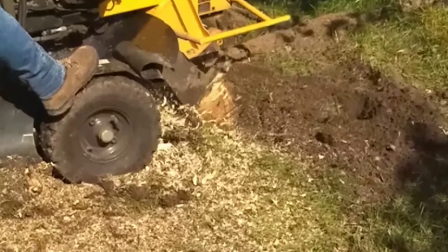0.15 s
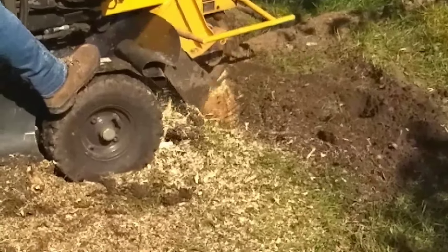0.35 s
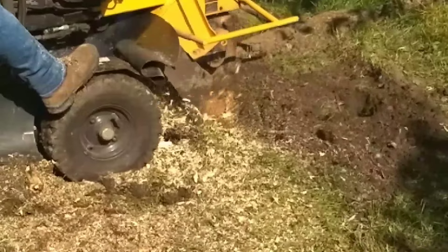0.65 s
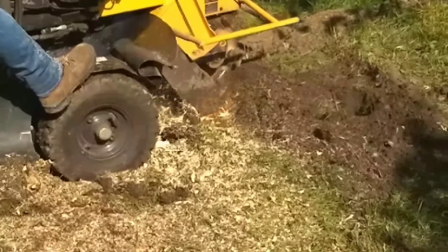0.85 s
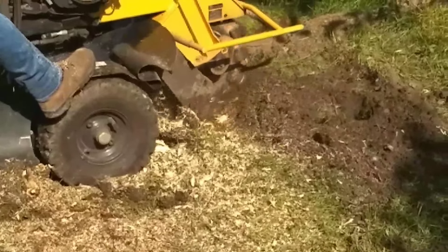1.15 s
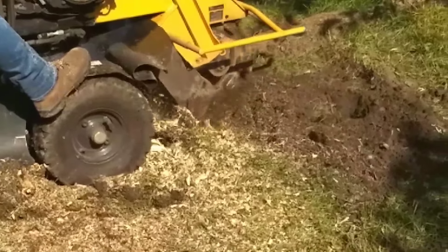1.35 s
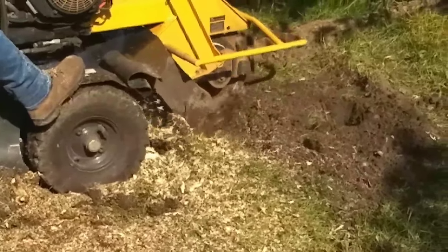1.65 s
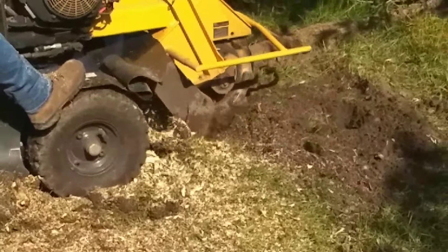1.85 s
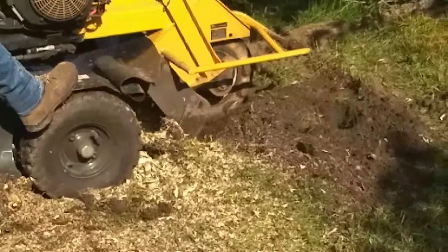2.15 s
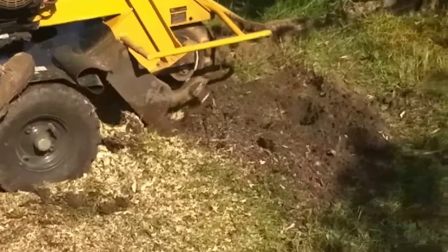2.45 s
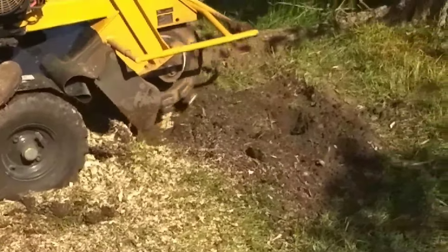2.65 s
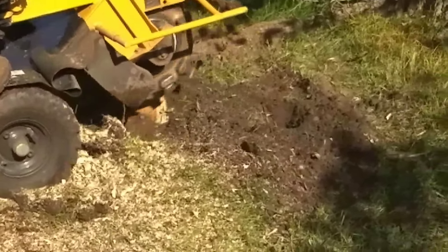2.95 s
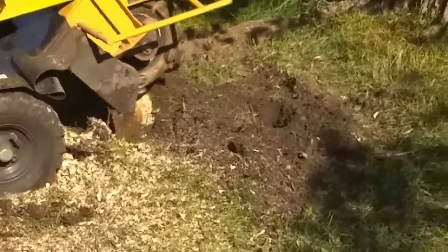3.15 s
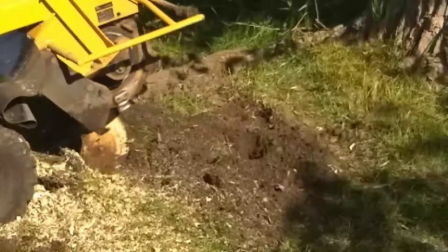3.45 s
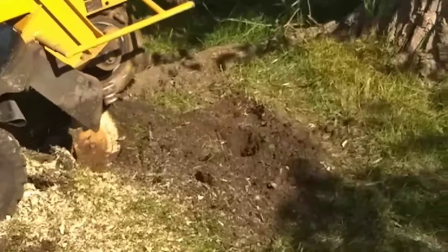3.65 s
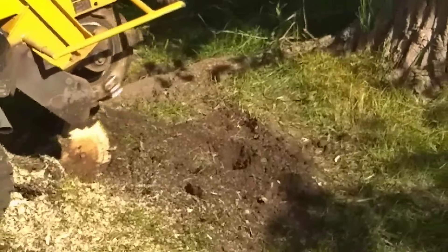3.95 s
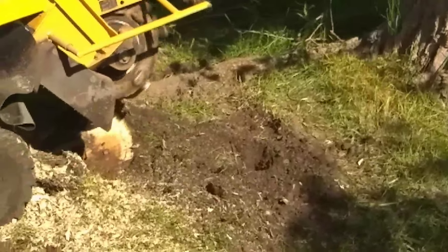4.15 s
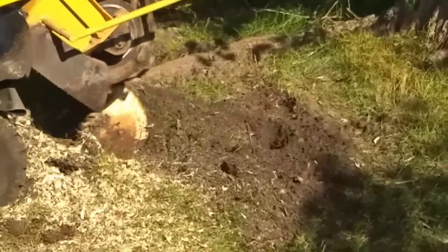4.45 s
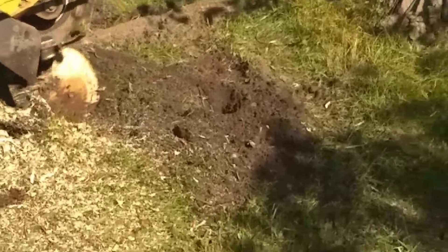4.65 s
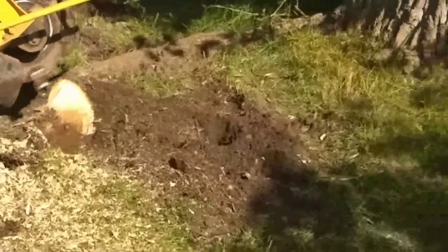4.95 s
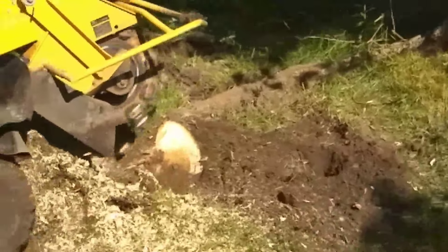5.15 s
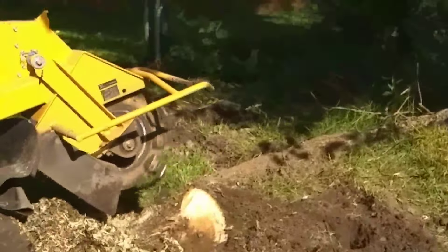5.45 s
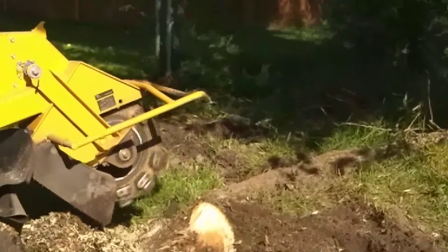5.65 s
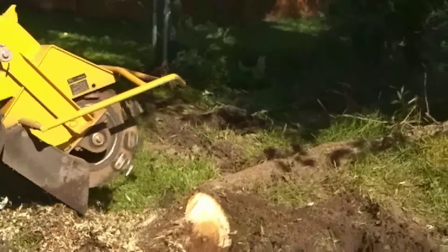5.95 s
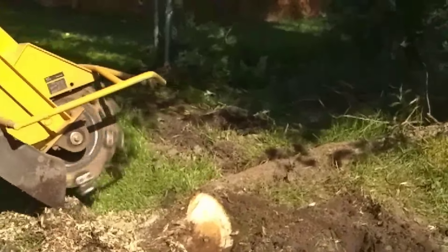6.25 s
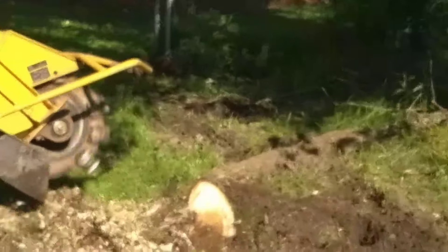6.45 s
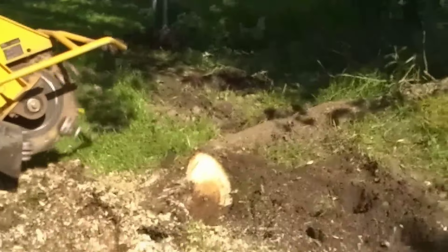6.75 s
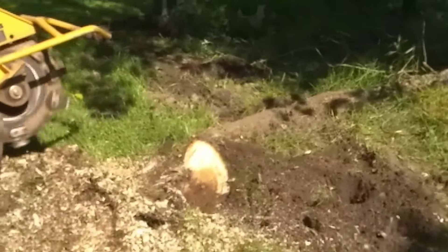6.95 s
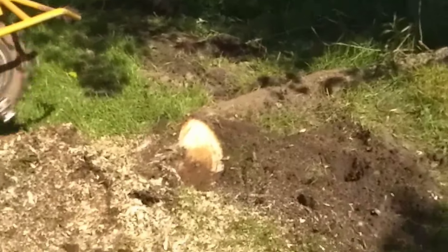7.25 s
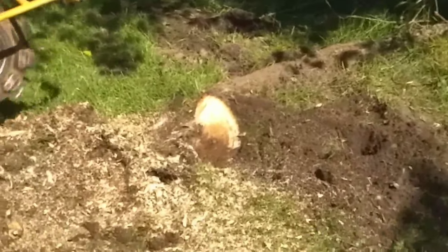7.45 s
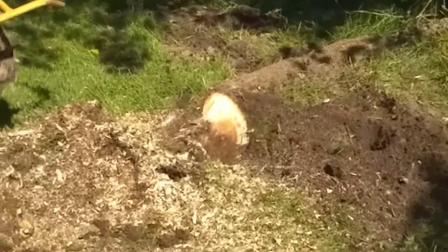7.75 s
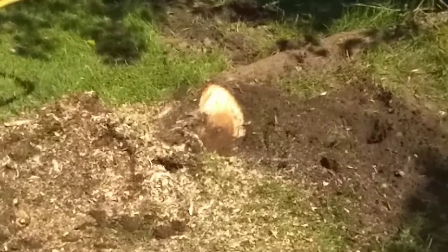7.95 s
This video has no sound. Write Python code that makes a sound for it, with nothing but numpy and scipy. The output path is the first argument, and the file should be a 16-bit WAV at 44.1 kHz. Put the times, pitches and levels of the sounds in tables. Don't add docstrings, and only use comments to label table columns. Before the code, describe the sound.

A loud stump grinder chews wood with a fast, rough, throbbing rattle while its labouring engine climbs slightly in pitch. Several sharp strikes clang close together, the level dips and recovers, and the cutting thins away. The freewheeling machine then keeps roaring, with fan and exhaust noise, belt whine and singing metal panels, and a single low knock. Close handheld microphone outdoors, wide hollow stereo, automatic level control, no obvious echo.

```python
import sys
import numpy as np
from scipy import signal
from scipy.fft import rfft, irfft, next_fast_len
from scipy.io import wavfile
from scipy.ndimage import map_coordinates

SR = 44100
rng = np.random.default_rng(int(sys.argv[2]) if len(sys.argv) > 2 else 0)


def transcribe(u):
    v = np.clip(np.atleast_2d(u).T, -1, 1)
    q = np.round(v * 32767).astype(np.int16)
    wavfile.write(sys.argv[1], SR, q)


def rack_gain(trim_db):
    fader = np.asarray(trim_db, float)
    return 10 ** (fader / 20)


N = 357210

# time_s, speed_cycles_per_s
ENGINE_SPEED = [(0, 28.3), (.5, 29.08), (.9, 30.17), (1.2, 30.73), (1.6, 30.54), (2.4, 30.89), (3.9, 30.67),
                (4.35, 30.77), (5.7, 30.44), (6.0, 30.51), (6.6, 30.51), (7.5, 30.74), (7.8, 30.5),
                (8.1, 30.5)]
FREE_CYCLES_PER_S, LABOUR_CYCLES_PER_S = 30.7, 28.3
# time_s, tooth_passes_per_engine_cycle
BELT_RATIO = [(0, 2.24), (.7, 2.252), (1.1, 2.263), (1.4, 2.276), (1.6, 2.258), (1.9, 2.27), (2.3, 2.293),
              (8.1, 2.293)]
# engine_multiple, rest_db, labour_gain_db
ENGINE_LINES = [(2, -38, 8), (3, -48.5, 8), (4, -49, 11), (5, -40, 7.5), (6, -36, 2), (7, -46, 12),
                (26.5, -46, -13), (32.5, -47, -5), (37, -41, -6)]
# engine_multiple, middle_s, length_s, peak_db
ENGINE_PANELS = [(4, 1.4, 2.2, -36.5), (4, 3, 3.3, -38), (7, 1.2, 0.61, -36), (5, 0.6, 1.1, -25.5),
                 (5, 2.18, 0.56, -37), (5, 3.75, .7, -48), (5, 5.13, 1.16, -36), (5, 6.64, 3, -33),
                 (6, 5.37, 2.75, -35), (26.3, 2.07, 0.59, -30), (26.5, 3.43, 0.74, -22.5),
                 (26.2, 4.63, 1, -26), (26.5, 5.83, 0.36, -27), (26.4, 6.3, 2, -32), (26.7, 6.4, .6, -32),
                 (32.3, 3.29, 0.89, -23), (32.5, 4.1, .8, -25), (37, 1.38, 0.28, -22.5),
                 (5, 1.28, 0.91, -34), (32.5, 4.28, 0.36, -20.5), (32.2, 5.6, 1.14, -28),
                 (32.5, 5.7, 0.65, -39), (33, 8.4, .7, -32), (32.5, 7.23, 1.2, -27)]
# engine_multiple, level_db
WEAK_LINES = [(8, -45), (10, -51.5), (11, -51), (12, -58), (14, -40), (16, -36.5), (18.5, -35), (29.5, -42),
              (40, -36.5), (44, -34.5), (48, -41), (56, -38)]
# tooth_multiple, rest_db, labour_gain_db
WHEEL_LINES = [(2, -50.5, 9), (4, -46, 4.5), (9, -36.5, 0), (12, -34, -18), (15, -30.5, -10)]
# tooth_multiple, middle_s, length_s, peak_db
WHEEL_PANELS = [(4, 1.2, 0.83, -39.5), (4, 2.3, .5, -38), (4, 7.1, 4.6, -36.5), (9, 2.3, 1.9, -40),
                (9, 4.84, .7, -31), (9, 5.88, 0.58, -27.5), (9, 6.65, 1.24, -22), (9, 7.48, 1.0, -24.5),
                (12, 0.32, 0.3, -32.5), (12, 1.84, 0.39, -30), (12, 2.59, 0.5, -27.5),
                (12, 3.8, 0.75, -24.5), (12, 4.86, 2, -30), (12, 5.65, 1.1, -33), (12, 7.5, 0.25, -35),
                (15, 0.51, 0.27, -28), (15, 1.35, 0.65, -34), (15, 1.9, 0.95, -32), (15, 2.96, .9, -32),
                (15, 3.87, 0.43, -25.5), (15, 5, .9, -31), (15, 6.65, 0.56, -25), (15, 7.5, 0.36, -24),
                (15, 8.1, 0.88, -27)]

ROAR_CENTRE_HZ = (300, 800, 3600, 9000)
# gain_share_0_1, chips_db, turn_away_db_per_s
ROAR_REGIONS = [(0.96, 1.5, -0.18), (0.95, -1, 0), (0.71, 1.5, 0.51), (.75, 3, 0)]
# freq_hz, density_db_per_hz
ROAR_SPECTRUM = [(70, -32), (130, -12.5), (250, -15), (400, -6), (600, -1.5), (900, -2), (1300, -1.1),
                 (1800, -4), (2260, -6), (2850, -5.5), (3700, -4), (5000, -8.5), (7500, -14),
                 (11000, -22.5), (15300, -22)]
ROAR_DB, CHIPS_FADE_S = -13.5, 0.024

# time_s, strike_db, second_tooth_rel_db, throb_depth_0_1
CUT = [
    (0, -14, -1, .35),
    (.8, -8, -4, 0.5),
    (1.1, -6, -14, 0.76),
    (1.41, -5, -13, .6),
    (1.43, -34, -6, 0.6),
    (1.58, -24, 0, 0.6),
    (1.8, -15.5, -7, .2),
    (2.2, -16, -8, 0),
    (2.6, -50, -8, 0),
]
# time_s, strength_db, bright_rel_db
HARD_STRIKES = [(1.4299, -6, 5), (1.4442, 1, -8), (1.4587, -2, 5), (1.4732, -4, 8), (1.4876, -12, 3),
                (1.5021, -12, 6), (1.5165, -15, 2), (1.531, -15, 3), (1.5606, -16, 2), (1.6763, -15, 3),
                (4.4148, 5, -24)]
HARDEST_STRIKE_S = 1.4442
# freq_hz, level_db, t60_s
GUARD_MODES = [
    [(950, -4, .008), (1500, 0, .005)],
    [(3300, -2, .009), (3750, 1, .012), (5900, -14, .005), (8000, -17, .004)],
]

# time_s, level_db
NEARNESS = [(0, 1), (.35, 2.5), (.9, 2), (1.25, -0.5), (1.42, 0.5), (2.2, 3), (2.7, 2), (3.0, -1.1),
            (3.5, 1.5), (4.3, 1.5), (4.7, 0), (5.4, 1), (5.8, 1.5), (6.2, -.5), (6.6, -0.5), (7.2, 0),
            (7.6, 0.5), (8.1, 2)]
# time_s, cutter_lag_samples, engine_lag_samples
BEARING = [(0, 2.4, 4.3), (1.6, 2.5, 5.3), (2.2, 5.4, 6.3), (3, 7.7, 6.4), (5, 7.7, 7.4), (6.5, 8.2, 7.2),
           (8.1, 10.5, 10)]
# freq_hz, likeness_0_1
PORT_LIKENESS = [(100, 0.91), (900, 0.97), (1600, 0.69), (3000, 0.53), (8000, 0.14), (15000, 0.1)]
# centre_hz, share_0_1, share_wander, delay_wander_samples
CROSS_BANDS = [(1100, 0.97, 0.011, 0.17), (2600, 0.78, 0.03, 0.84), (3000, 0.25, 0.11, 0.28),
               (4130, 0.75, 0.068, 0.24), (7200, 0.38, 0.17, 0.28), (9100, 0.4, 0.11, 0.14),
               (11500, 0.62, 0.31, 0.29), (14900, 0.1, 0.22, 0.22)]
# time_s, share_lost
PORT_LOOSENING = [(0, -0.093), (3, -0.056), (5.3, -0.011), (6.6, 0.17), (7.2, 0.12), (8.1, 0.065)]
PORT_DELAY_SAMPLES, BASS_EXTRA_DELAY_SAMPLES, BASS_SHELF_HZ = 18.9, 4.4, 746
HELD_DB, DIVE_DB, WAIT_S, CLIMB_DB_PER_S = -4.5, -12.5, 0.099, 10


def at_time(rows):
    time_s, *columns = np.transpose(rows)
    return [np.interp(np.arange(N) / SR, time_s, column) for column in columns]


def at_hz(points, hz):
    freq_hz, value = np.transpose(points)
    return np.interp(np.log(hz), np.log(freq_hz), value)


def drift(rate_hz):
    step = 40
    pole = np.exp(-2 * np.pi * step * rate_hz / SR)
    noise = rng.standard_normal(N // step + 2002)
    slow = signal.lfilter([1], [1, -2 * pole, pole * pole], noise)[2000:]
    return np.interp(np.arange(N) / step, np.arange(len(slow)), slow / slow.std())


def ports(x, lag_samples):
    late = map_coordinates(x, [np.arange(N) - lag_samples], order=2, mode="nearest")
    return np.array([x, late])


def gain_control():
    since_s = np.arange(N) / SR - HARDEST_STRIKE_S
    climb_db = np.minimum(DIVE_DB + CLIMB_DB_PER_S * np.maximum(since_s - WAIT_S, 0), 0)
    return np.where(since_s < 0, HELD_DB, climb_db) + at_time(NEARNESS)[0]


def roar(engine_cycles, tooth_cycles, throb, lags, gain_db):
    t = np.arange(N) / SR
    chips = np.clip((HARDEST_STRIKE_S - t) / CHIPS_FADE_S, 0, 1)
    swell_db = np.array([share * gain_db + chips_db * chips + turn_db_per_s * (t - 5)
                         for share, chips_db, turn_db_per_s in ROAR_REGIONS])
    puff = 0.028 * np.cos(4 * np.pi * engine_cycles) + 0.051 * np.cos(2 * np.pi * engine_cycles + 1)
    chew = 0.43 * np.cos(2 * np.pi * tooth_cycles) + 0.47 * np.cos(4 * np.pi * tooth_cycles)
    chew = throb * chew
    rattle = rack_gain(0.69 * drift(200) + 0.5 * drift(6.3))

    white = rng.standard_normal((2, 3, N))
    edges_hz = 50 * 2 ** np.arange(0, 8.4, 1 / 3)
    cutter_end, engine_end = np.zeros((2, N))
    diffuse, power = np.zeros((2, N)), 0
    for k, (low, high) in enumerate(zip(edges_hz, edges_hz[1:])):
        band_sos = signal.butter(2, [low, high], "band", fs=SR, output="sos")
        bands = signal.sosfilt(band_sos, white[k % 2])
        hz = np.sqrt(low * high)
        weights = [np.interp(np.log(hz), np.log(ROAR_CENTRE_HZ), row) for row in np.eye(4)]
        colour_db = at_hz(ROAR_SPECTRUM, hz)
        gain = rack_gain(colour_db + weights @ swell_db + 0.9 * drift(2.9)) * (1 + puff)
        if hz > 1500:
            gain = gain * rattle * np.clip(1 + chew, 0.05, 3)
        alike = np.clip(at_hz(PORT_LIKENESS, hz), 0, 1)
        direct = engine_end if hz < 1100 else cutter_end
        direct += np.sqrt(alike) * gain * bands[0]
        diffuse += np.sqrt(1 - alike) * gain * bands[1:]
        power += rack_gain(colour_db) ** 2 * (high - low) * 2 / SR
    mix = ports(cutter_end, lags[0]) + ports(engine_end, lags[1]) + diffuse
    return rack_gain(ROAR_DB) / np.sqrt(power) * mix


def line_levels(resting, panels, labour):
    step = 64
    t = np.arange(0, N, step) / SR
    multiples = np.array(resting)[:, 0]
    power = np.array([rack_gain(db + labour_db * labour[::step]) ** 2 for _, db, labour_db in resting])
    for multiple, middle_s, length_s, peak_db in panels:
        swell = np.cos(np.pi * np.clip((t - middle_s) / length_s, -0.5, 0.5))
        nearest = np.argmin(abs(multiples - multiple))
        power[nearest] += (rack_gain(peak_db) * swell) ** 2
    return [np.interp(np.arange(N) / SR, t, 10 * np.log10(row)) for row in power]


def lines(cycles, multiples, levels_db, wobble_db, wander_rad):
    out = np.zeros(N)
    for k, db in zip(multiples, levels_db):
        phase = 2 * np.pi * (k * cycles + rng.random()) + wander_rad * np.sqrt(k) * drift(2.94)
        level = rack_gain(db + wobble_db * np.sqrt(k) * drift(5.1))
        out += np.sqrt(2) * level * np.sin(phase)
    return out


def wheel_hum(tooth_cycles, labour):
    levels_db = line_levels(WHEEL_LINES, WHEEL_PANELS, labour)
    return lines(tooth_cycles, [row[0] for row in WHEEL_LINES], levels_db, 0.6, 0.25)


def engine_drone(engine_cycles, labour):
    levels_db = line_levels(ENGINE_LINES, ENGINE_PANELS, labour)
    strong = lines(engine_cycles, [row[0] for row in ENGINE_LINES], levels_db, 0.4, 0.12)
    weak_db = [db + 1.5 - 6 * labour for _, db in WEAK_LINES]
    return strong + lines(engine_cycles, [k for k, _ in WEAK_LINES], weak_db, 0.71, 0.26)


def teeth(tooth_cycles, strike_db, second_db):
    half = np.floor(2 * tooth_cycles)
    at = np.flatnonzero(np.diff(half)) + 1
    luck = rng.standard_normal((N, 4))[at]
    size_db = strike_db[at] + second_db[at] * (half[at] % 2) + 0.71 * luck[:, 1]
    when = np.clip(at + (10 * luck[:, 0]).astype(int), 0, N - 1)
    clicks = np.zeros((2, N))
    clicks[:, when] = rack_gain(size_db + [[-5], [0]] + 2.0 * luck[:, 2:].T)
    for time_s, db, bright_db in HARD_STRIKES:
        clicks[:, round(time_s * SR)] += rack_gain(db), rack_gain(db + bright_db)

    tails = signal.lfilter([1], [1, -np.exp(-1 / (0.0011 * SR))], clicks + 1e-18)
    splinters = 0.18 * tails * rng.standard_normal(N)
    bare_crack = signal.lfilter([1], [1, -0.7], clicks[0])
    out = 0.15 * splinters[1] - 0.6 * bare_crack
    for push, modes in zip(splinters - clicks, GUARD_MODES):
        for hz, db, t60_s in modes:
            r, w = rack_gain(-60 / (t60_s * SR)), 2 * np.pi * hz / SR
            ring = signal.lfilter([0, np.sin(w)], [1, -2 * r * np.cos(w), r * r], push)
            out += 0.4 * rack_gain(db) * ring
    return signal.sosfilt(signal.butter(2, 600, "high", fs=SR, output="sos"), out)


def scene():
    rate = at_time(ENGINE_SPEED)[0]
    labour = np.clip((FREE_CYCLES_PER_S - rate) / (FREE_CYCLES_PER_S - LABOUR_CYCLES_PER_S), 0, 1)
    engine_cycles = np.cumsum(rate) / SR
    tooth_cycles = np.cumsum(rate * at_time(BELT_RATIO)[0]) / SR
    tooth_cycles = tooth_cycles - tooth_cycles[round(HARDEST_STRIKE_S * SR)]
    strike_db, second_db, throb = at_time(CUT)
    lags, gain_db = at_time(BEARING), gain_control()

    noise = roar(engine_cycles, tooth_cycles, throb, lags, gain_db)
    hum = wheel_hum(tooth_cycles, labour) + engine_drone(engine_cycles, labour)
    strikes = teeth(tooth_cycles, strike_db, second_db)
    return noise + ports(hum * rack_gain(0.84 * gain_db), lags[1]) + ports(strikes, lags[0])


def roll_off(x):
    return signal.sosfilt(signal.butter(12, 15750, fs=SR, output="sos"), x)


def record(dry):
    size = next_fast_len(N + 8192)
    hz = np.arange(size // 2 + 1) * SR / size
    both = rfft(dry, size) * 0.5 * (1 + BASS_SHELF_HZ / (1j * hz + 30))
    delay_samples = PORT_DELAY_SAMPLES + BASS_EXTRA_DELAY_SAMPLES * np.exp(-hz / 1000)
    late = both[::-1] * np.exp(-2j * np.pi * hz * delay_samples / SR)
    sides = irfft(both, size)[:, :N]
    centres_hz = np.array(CROSS_BANDS)[:, 0]
    share_lost = at_time(PORT_LOOSENING)[0]
    for (_, share, wander, slip_samples), row in zip(CROSS_BANDS, np.eye(len(CROSS_BANDS))):
        band = irfft(late * np.interp(hz, centres_hz, row), size)[:, :N]
        reading = [np.arange(N) + slip_samples * (0.5 * drift(2.5) + 0.45 * drift(8))]
        band = np.array([map_coordinates(side, reading, order=2, mode="nearest") for side in band])
        sides -= np.clip(share - share_lost + wander * drift(2.8), 0.2, 1) * band
    sides = np.tanh(sides / 1.421) * 1.236
    sides = signal.sosfilt(signal.butter(2, 45, "high", fs=SR, output="sos"), sides)
    sides = signal.sosfilt(signal.ellip(10, 0.5, 45, 15480, fs=SR, output="sos"), sides)
    return roll_off(sides)


dry = scene()
out = record(dry)
transcribe(out)
```